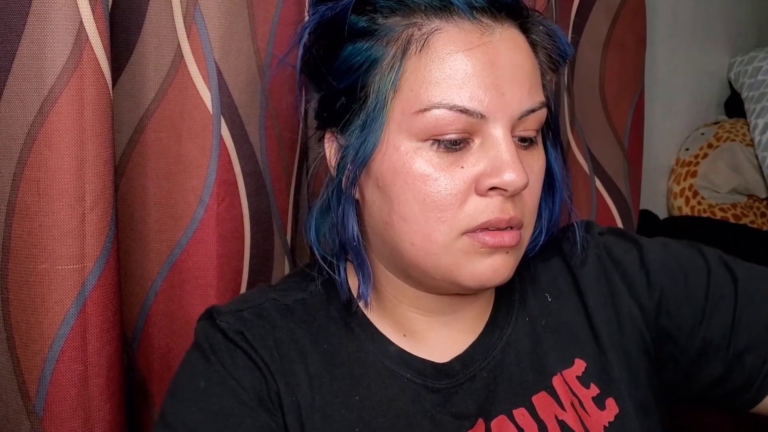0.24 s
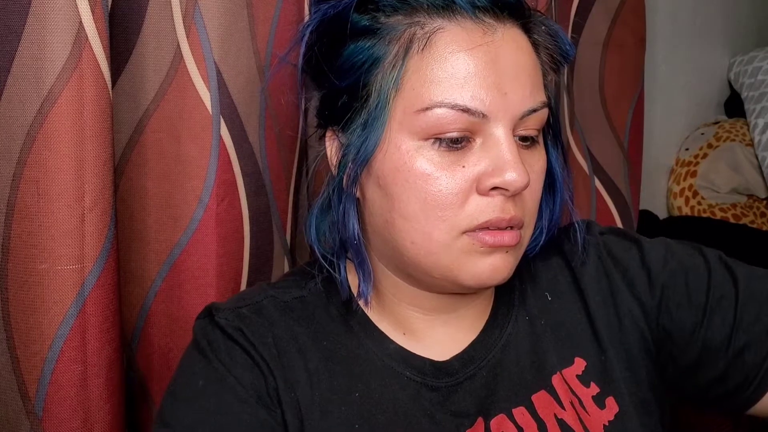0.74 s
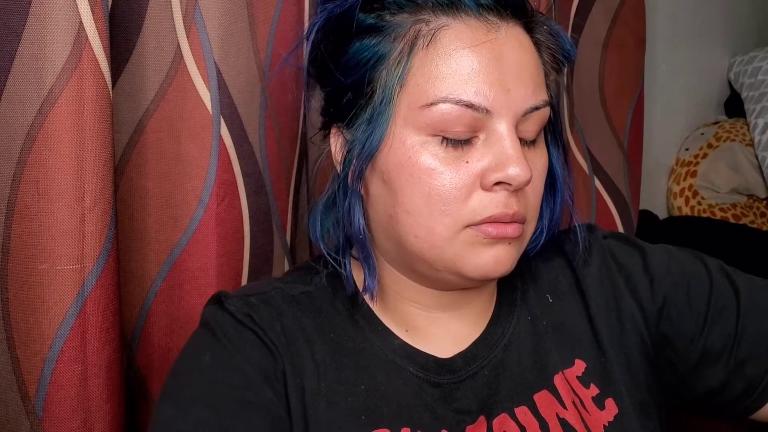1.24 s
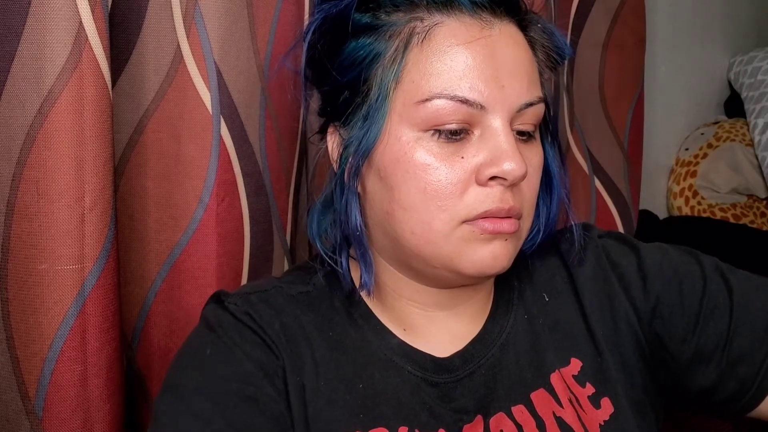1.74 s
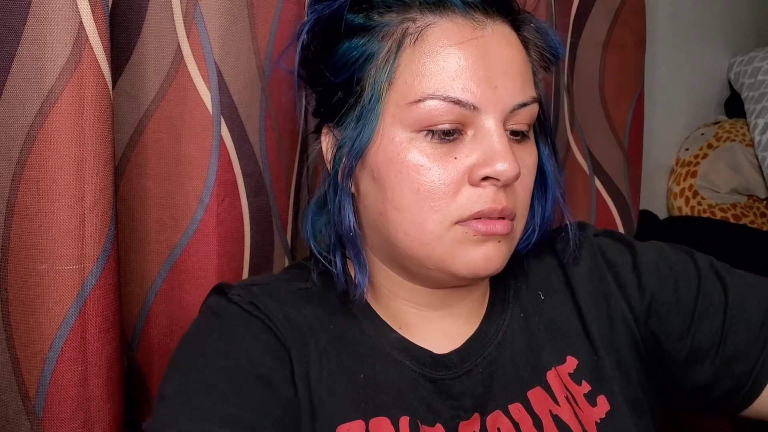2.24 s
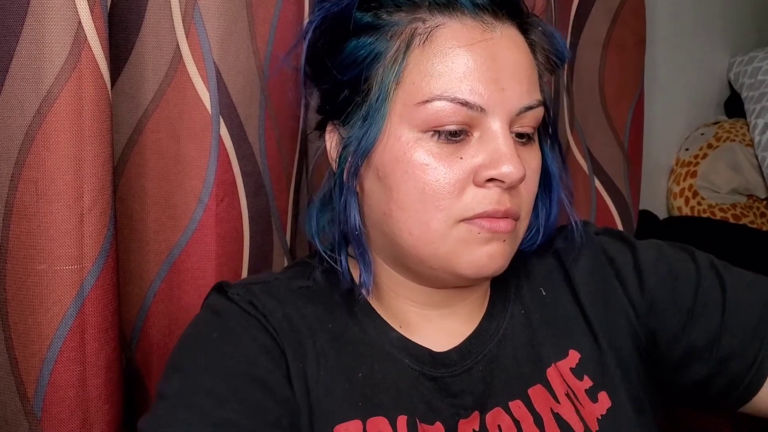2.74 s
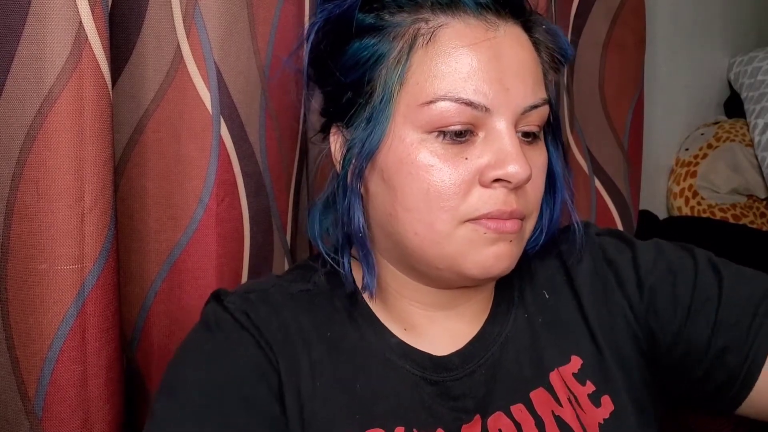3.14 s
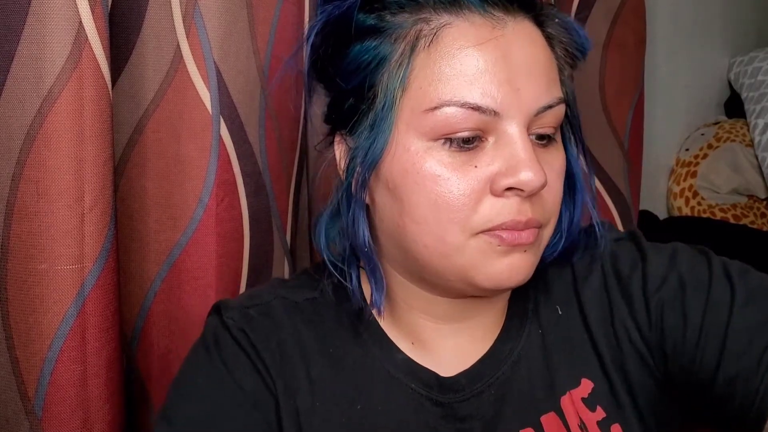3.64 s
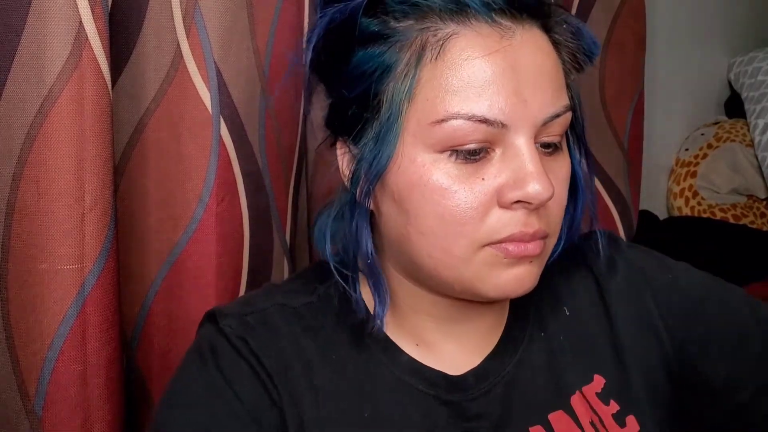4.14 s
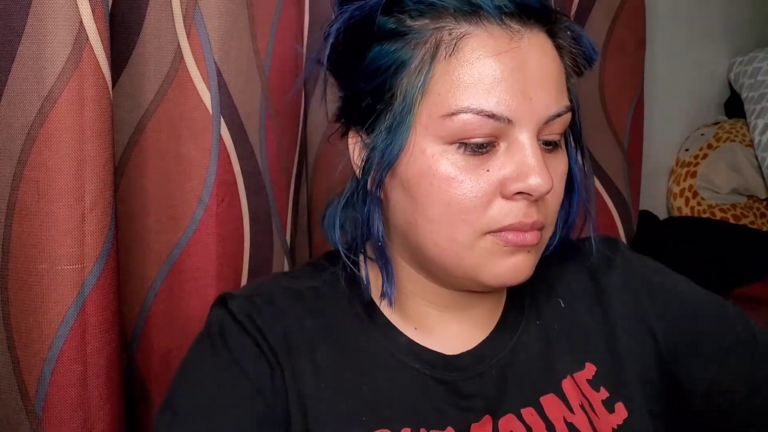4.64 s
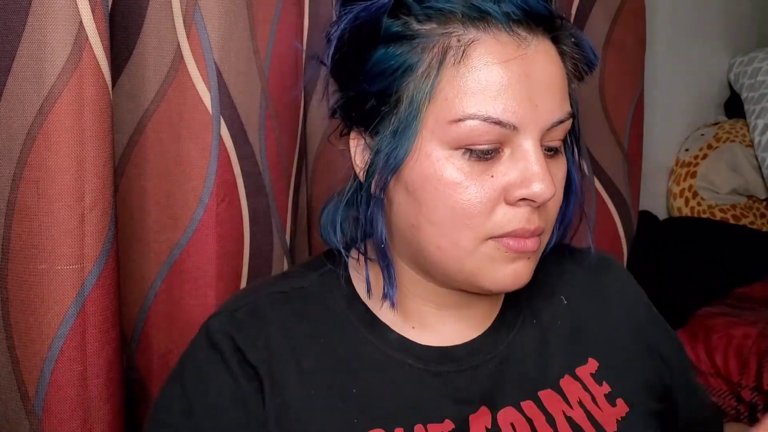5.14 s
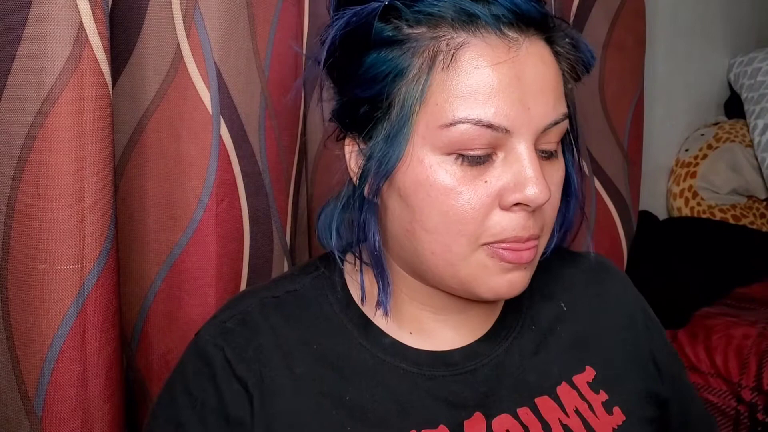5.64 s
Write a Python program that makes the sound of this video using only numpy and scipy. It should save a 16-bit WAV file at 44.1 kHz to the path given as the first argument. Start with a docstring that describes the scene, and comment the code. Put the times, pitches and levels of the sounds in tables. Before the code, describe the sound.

Dry, bright paper crackle opens with a strong tear, drops away, then builds into crinkles and a sharp rip around two and a half seconds. After a quieter patch and a woody knock, dense crumpling resumes, ending with a few table taps. Close stereo pickup to the right, small room, very low background noise.

```python
"""A paper packet is torn and crumpled by hand to the right of a two-port microphone, in a small quiet room.
Showers of tiny noise breaks follow the handling level, with noise-burst creases on top, coloured by the sheet.
Bumps ring decaying table modes; the house is shaped noise with fuzzy low tones and sine thuds.
Paper and table also feed a short noise-tail reverberation."""
import sys
import numpy as np
from scipy import signal
from scipy.fft import rfft, irfft, next_fast_len
from scipy.io import wavfile
from scipy.ndimage import uniform_filter1d, map_coordinates

SR = 44100
rng = np.random.default_rng(int(sys.argv[2]) if len(sys.argv) > 2 else 0)


def materialize(psi):
    """Save the field psi as 16-bit PCM at rate SR to the path in sys.argv[1].

    A 1-D psi becomes a single channel; in a 2-D psi each row is a channel.
    """
    bounded = np.clip(np.atleast_2d(psi).T, -1, 1)
    quanta = np.round(bounded * 32767).astype(np.int16)
    wavfile.write(sys.argv[1], SR, quanta)


N = 259749  # length [samples]

# House noise colour: (frequency [Hz], relative density [dB per Hz])
HOUSE_COLOUR = [(12, -55.5), (20, -32), (40, -10), (70, 2), (107, -12), (198, -11.5), (262, -12.5),
                (367, -13), (399, -15), (527, -17.5), (949, -30.5), (2460, -36.5), (3160, -32), (3440, -30),
                (16000, -61)]
HOUSE_DB = -55.5  # middle of its slow drift
# Fuzzy steady bands: (centre [Hz], width [Hz], rms level [dB])
HUM_BANDS = [(51.6, 56, -64), (122.3, 5.7, -66), (152.7, 6.3, -66.5), (357, 2.9, -72), (3650, 1100, -80)]
# Distant low thuds: (start [s], peak before port gain [dB], frequency [Hz], length [s])
FAR_THUDS = [(0.015, -45, 55.0, 0.17), (0.806, -41, 55.0, 0.13), (1.777, -41, 54.6, 0.085),
             (3.106, -46, 54.6, 0.088), (3.87, -42, 51, 0.16), (4.76, -46, 58.6, 0.12)]
# House noise likeness of left and right: (frequency [Hz], correlation [-1 to 1])
PORT_LIKENESS = [(60, 0.91), (240, 0.95), (950, 0.54), (3770, -0.74), (15000, 0.17)]

# Sudden rips, before the sheet: (start [s], length [s], level at start [dB], level at end [dB])
RIP_EVENTS = [(.141, .2, -23.5, -28.5), (0.887, 0.18, -47, -70), (1.358, .143, -34.5, -41.5),
              (1.724, .095, -37, -32), (1.82, .048, -27, -29), (1.945, .13, -35.5, -39.5),
              (2.557, 0.061, -38.5, -48.5), (2.635, 0.16, -17.5, -43), (4.716, 0.072, -22.5, -32),
              (5.063, .07, -34.5, -54)]
RIP_BITE_S, RIP_STOP_S = .008, .012  # time to rise and to fall 20 dB
# Squeezes, before the sheet: (peak time [s], peak level [dB], 20 dB rise [s], 20 dB fade [s])
SQUEEZE_EVENTS = [(.096, -43, .1, .2), (.36, -43.5, 0.2, .045), (.49, -43.5, .35, .08),
                  (.8, -57, 0.26, 0.28), (1.08, -68, .3, .5), (1.213, -43, .09, .12), (1.3, -51, .3, .05),
                  (1.54, -30, 0.0724, 0.2351), (1.93, -42.5, .05, 0.02), (2.1, -42, .3, .9),
                  (2.339, -27.5, 0.154, 0.1254), (2.475, -40, 0.32, 0.04), (2.826, -36, 0.07, 0.04),
                  (2.893, -34, 0.1, 0.12), (3.1, -47, 0.18, .07), (3.221, -47, 0.16, 0.1),
                  (3.31, -44.5, .08, .07), (3.345, -43, .025, .03), (3.44, -48, .07, .15),
                  (3.575, -47.5, 0.14, 0.02), (4.035, -62, 0.47, 0.13), (4.194, -35.5, 0.13, .2),
                  (4.278, -30, 0.05, 0.07), (4.366, -32, 0.03, .05), (4.526, -32.5, 0.13, 0.11),
                  (4.582, -29.5, .045, 0.13), (4.817, -30.5, 0.1538, .115), (4.921, -39.5, .02, .155),
                  (5.228, -51.5, .09, 0.17), (5.344, -36, 0.08, 0.0745), (5.49, -40, .4, .06),
                  (5.6, -69.5, .1, 3.5)]
REST_DB = -79  # packet merely held

# Clearest creases snapping, before the sheet: (time [s], level [dB], length scale [ms], dullness [-1 to 1])
CREASE_SNAPS = [(.0826, -27.5, 2.6, -.35), (.1103, -21.5, 3.3, -0.55), (.1356, -27, 2.6, .55),
                (.358, -33, 7.8, .9), (.4647, -47, 3.3, -.8), (.707, -47.5, 3.5, .79), (.737, -50, 3, 0),
                (.796, -49, 7.2, .9), (.8928, -32.5, 5.8, -0.22), (1.1789, -40, 3, .05),
                (1.2021, -34.5, 2.1, .9), (1.215, -26.5, 2.5, -0.79), (1.3694, -28.5, 4, .43),
                (1.4361, -21, 6, -.44), (1.468, -35, 5.6, -.34), (1.4772, -31, 3.3, .9),
                (1.5145, -30.5, 4.4, .8), (1.5453, -30.5, 4.1, .6), (1.6088, -32.5, 3.5, 0.59),
                (1.65, -34, 11, -0.35), (1.7009, -32, 2, .02), (1.7224, -32.5, 6.6, -0.56),
                (1.8602, -20, 3.9, -0.69), (1.9494, -19, 1.88, .97), (1.9856, -33, 7.9, .03),
                (2.102, -34, 5.2, .53), (2.1679, -32, 4.8, -.9), (2.1942, -30, 3, -0.22),
                (2.275, -29.5, 6.3, -0.046), (2.3544, -19.5, 3.8, -.9), (2.4582, -33, 3.2, -.57),
                (2.506, -26, 3.1, -0.75), (2.529, -31, 1.9, -.41), (2.564, -27.5, 3.3, 0.27),
                (2.7285, -29, 2.5, -.5), (2.762, -27, 3, -0.9), (2.7805, -30, 6, -.04),
                (2.8264, -31, 5.4, -.35), (2.8455, -29, 5.9, -0.69), (2.9212, -31, 2.3, -.58),
                (3.0459, -37, 1.8, -0.076), (3.1106, -35.5, 8, -0.81), (3.1644, -36.5, 6.2, -0.55),
                (3.442, -37.6, 5.6, -0.53), (3.4595, -37, 2.8, -.68), (3.5492, -32, 1.5, -0.67),
                (3.5617, -34.5, 3.2, -.9), (3.5856, -45, 9, .54), (3.75, -47, 5.9, -.69),
                (4.155, -33, 4.5, -.7), (4.1835, -31, 6.6, -0.24), (4.199, -25, 2.5, -.54),
                (4.2245, -28, 6.9, -0.053), (4.2685, -22, 10, -0.61), (4.291, -23.5, 2.8, -0.37),
                (4.325, -29, 3.4, -.93), (4.365, -23, 10, -0.38), (4.4148, -37.5, 2.8, -.01),
                (4.4652, -32, 2.9, -.06), (4.4786, -28, 2.7, -0.42), (4.521, -25.5, 7.8, -0.64),
                (5.0647, -30.5, 4.1, -0.46), (5.2134, -38.5, 5.7, -0.44), (5.2886, -36, 4, 0.71),
                (5.33, -38.5, 9.2, -0.58), (5.4108, -33.5, 6.1, -.38), (5.7318, -49.5, 5.1, -.54)]
SMALL_SNAPS = 70  # count of lesser creases
SMALL_OVER_DB, SMALL_SPREAD_DB = 6.5, 2.5  # over the crackle around them; plus or minus
SMALL_TOP_DB = -33  # cap before the spread
SMALL_MS, SMALL_DULL = 3.6, -.3  # mean length scale and dullness
SNAP_ABOVE_DB = -60  # gentler handling breaks no lesser crease

# Paper colour: (frequency [Hz], relative density [dB per Hz])
PAPER_COLOUR = [(180, -50.5), (300, -8.5), (398, -11.5), (614, -7.5), (814, -8), (1060, -11.5),
                (1610, -9.5), (1900, -11), (2250, -9), (3400, -4.5), (4370, -7), (9240, -10.5), (11900, -5),
                (15000, -10.5), (16000, -20)]
# Bent sheet: (time [s], gain near 780 Hz [dB], gain near 1.4 kHz [dB], treble gain [dB])
SHEET_BENDS = [(0, -10, 1, -7.5), (.15, -1, 3, -2.5), (.4, 0, 4.5, -5.5), (.6, 2, 1, -5),
               (.85, -8, -1, -6.5), (1.25, -5, -3.5, -5), (1.5, -11.5, 4, -6.5), (1.75, -4.5, 1, 1),
               (2.0, -9, 4, -4), (2.4, 0, 5, -2), (2.7, -5, -1, 1.5), (3.2, 1.5, 5, 1.5),
               (3.55, -2, -1.5, 1), (3.85, 7, 4, -9.5), (4.15, -6, -3, 1.5), (4.35, -10, -4, -1.5),
               (4.5, -7.5, 7, -1.5), (4.75, -4, 5, 0), (4.95, 0, 9, -1), (5.3, 1, 3, -2),
               (5.6, -4, 7.5, -2), (5.89, -5, 2, -10)]
# Packet position: (time [s], left minus right in the treble [dB], left lag [samples])
PACKET_PLACE = [(0, -4.5, 11.9), (.75, -9.5, 10.3), (1.3, -7.5, 9.8), (1.8, -9, 14.1), (2.8, -9.5, 12.8),
                (3.4, -13, 17.8), (3.8, -10.5, 17.6), (4.3, -7, 13.05), (4.8, -6.5, 6.1), (5.3, -2, 10.5),
                (5.89, -9, 8.8)]

# Bumps on the table: (time [s], nominal level [dB], t60 stretch [factor], favoured pitch [Hz])
TABLE_BUMPS = [(.158, -26.5, 0.62, 700), (0.213, -50, 1.3, 880), (0.656, -53, 1.2, 201),
               (1.72, -48.5, 3.5, 265), (2.32, -42, 1.02, 690), (2.635, -34.5, 1.56, 396),
               (3.5807, -25.5, 1, 560), (3.585, -38, 1.6, 118), (3.5995, -39.5, 1.6, 320),
               (4.149, -42, 1.1, 178), (4.713, -44, 1.1, 316), (5.329, -34.5, 1.12, 420),
               (5.359, -33.5, 1, 330), (5.368, -40, 0.74, 110), (5.396, -40, 1.3, 443),
               (5.419, -37, 1.08, 446), (5.447, -49.5, 1.3, 380), (5.674, -38.5, 0.93, 1800),
               (5.684, -41.5, .9, 900)]
# Table modes: (frequency [Hz], relative level [dB], unstretched t60 [s])
TABLE_MODES = [(116, 9.5, 0.031), (230, -3, .06), (347.3, -8.5, 0.12), (424, -2.5, 0.053),
               (557, -0.5, 0.036), (652, -1.5, 0.032), (850, -16, 0.032), (990, -16.5, .04),
               (1260, -17, 0.018), (1443, -12, 0.038), (1820, -12.5, 0.018), (2200, -19.5, .03)]

# Room decay: (frequency [Hz], t60 [s])
ROOM_T60 = [(300, 0.16), (2000, 0.26), (12000, 0.047)]
TOP_HZ = 15800  # middle of the final treble fade


def amp(db):
    """Decibels to amplitude."""
    return 10 ** (np.asarray(db) / 20)


def unit(x):
    """Scale to an rms of one."""
    return x / np.sqrt(np.mean(x ** 2) + 1e-20)


def along(points, hz):
    """Read (frequency [Hz], value) points on a log axis."""
    f, v = np.transpose(points)
    return np.interp(np.log(hz + 1), np.log(f + 1), v)


def curves(rows, t):
    """Each column after the time, read at times t."""
    s, *cols = np.transpose(rows)
    return [np.interp(t, s, c) for c in cols]


def wobble(knots_per_s):
    """A smooth random curve through normal knots."""
    knots = rng.standard_normal(int(N * knots_per_s / SR) + 4)
    return map_coordinates(knots, [np.arange(N) * knots_per_s / SR])


def filtered(x, response):
    """x times a response of frequency."""
    m = next_fast_len(N + SR // 2)
    return irfft(rfft(x, m) * response(np.fft.rfftfreq(m, 1 / SR)), m)[..., :N]


def add(track, s, sound):
    """Mix a sound in at s seconds."""
    k = max(round(s * SR), 0)
    track[k:k + len(sound)] += sound[:len(track) - k]


def port_noise(gain):
    """Unit noise at two ports; the mid/side balance sets their correlation at each frequency."""
    def mid_side(hz):
        angle = np.arccos(np.clip(along(PORT_LIKENESS, hz), -1, 1)) / 2
        return gain(hz) * np.array([np.cos(angle), np.sin(angle)])

    mid, side = filtered(rng.standard_normal((2, N)), mid_side)
    return unit(np.array([mid + side, mid - side]))


def thuds():
    """Distant low sines under a quick swell and exponential fade."""
    out = np.zeros(N)
    for s, db, hz, length_s in FAR_THUDS:
        t = np.arange(round(length_s * SR)) / SR
        v = 12 * t / length_s
        envelope = v * np.exp(1 - v / 2) / 2  # peaks at 1
        add(out, s, amp(db) * np.sin(2 * np.pi * hz * t) * envelope)
    return out


def house():
    """Drifting air and appliance noise, fuzzy tones, and thuds a little louder at the left port than the right."""
    drift_db = HOUSE_DB + 1.36 * wobble(1.4)
    air = amp(drift_db) * port_noise(lambda hz: amp(along(HOUSE_COLOUR, hz)))
    for centre, width, db in HUM_BANDS:
        air += amp(db) * port_noise(lambda hz: 1 / (1 + (2 * (hz - centre) / width) ** 2))
    return air + thuds() * amp([[.7], [-.7]])


def handling():
    """Crackle level in dB: rips bite and stop, squeezes swell and fade, and their powers add."""
    t, power = np.arange(N) / SR, amp(REST_DB) ** 2
    for s, length_s, start_db, end_db in RIP_EVENTS:
        body_db = np.interp(t, [s, s + length_s], [start_db, end_db])
        edges = np.maximum(s - t, 0) / RIP_BITE_S + np.maximum(t - s - length_s, 0) / RIP_STOP_S
        power = power + amp(body_db - 20 * edges) ** 2
    for s, db, rise_s, fade_s in SQUEEZE_EVENTS:
        power = power + amp(db - 20 * np.maximum((s - t) / rise_s, (t - s) / fade_s)) ** 2
    return 10 * np.log10(power)


def small_snaps(crackle_db):
    """Lesser creases give way at random while the packet is worked, as hard as the handling then, to a cap."""
    when, size, life, tone = rng.random((SMALL_SNAPS, 4)).T
    busy = np.flatnonzero(crackle_db > SNAP_ABOVE_DB)
    at = busy[(when * len(busy)).astype(int)]
    db = np.minimum(crackle_db[at] + SMALL_OVER_DB, SMALL_TOP_DB)
    db = db + SMALL_SPREAD_DB * (2 * size - 1)
    return list(zip(at / SR, db, SMALL_MS * (.5 + life), SMALL_DULL + tone - .5))


def shower(crackle_db):
    """Clumped tiny breaks of unequal size; the wide sheet gives each port partly its own."""
    sparse = np.clip(-(crackle_db + 19.0) / 30, .55, 1.3)  # a gentle crumple is lumpier than a full rip
    clumps_db = .4 * wobble(40) + 2.3 * wobble(180) + 2.2 * wobble(700)
    sizes_db = np.minimum(2.6 * rng.exponential(size=N), 9) + sparse * clumps_db
    strength = amp(crackle_db) * unit(amp(sizes_db))
    both, own = rng.standard_normal(N), rng.standard_normal((2, N))
    own = filtered(strength * own, lambda hz: np.clip(hz / 1300, 0, 1))  # less of it in long waves
    return np.cos(.85) * strength * both + np.sin(.85) * own


def fibres():
    """Breaking fibres, with creases snapping on top as short bursts of partly shared noise."""
    crackle_db = handling()
    out = shower(crackle_db)
    t = np.arange(SR // 20) / SR
    for s, db, ms, dull in [*CREASE_SNAPS, *small_snaps(crackle_db)]:
        grit = rng.standard_normal((3, len(t)))
        u = t * 1000 / max(ms, 1)
        envelope = np.exp(-((u - .45) / 0.33) ** 2) + 0.058 * np.exp(-u)
        for port in (0, 1):
            heard = np.cos(.7) * grit[2] + np.sin(.7) * grit[port]
            # a dull crease loses its treble
            burst = unit(np.convolve(heard, [1, np.clip(dull, -1, 1)], "same"))
            add(out[port], s, amp(db) * burst * envelope)
    return out


def sheet(breaks):
    """The sheet colours the breaks as it is bent; the far port hears it weaker and later."""
    hz, t, z = signal.stft(breaks, SR, nperseg=256)
    hz = hz[:, None]
    body_db, ring_db, fine_db = curves(SHEET_BENDS, t)
    pan_db, lag = curves(PACKET_PLACE, t)
    body = 1 / (1 + ((hz - 780) / 330) ** 2)
    ring = 1 / (1 + ((hz - 1400) / 260) ** 2)
    treble = np.clip(np.log2((hz + 1) / 5000), 0, 1)
    bend_db = body * body_db + ring * ring_db + treble * fine_db
    # random flicker, smoothed over frequency and time
    field = uniform_filter1d(uniform_filter1d(rng.standard_normal(z.shape[1:]), 5, 0), 8, 1)
    z = z * amp(along(PAPER_COLOUR, hz) + bend_db + 2.0 * unit(field) + 5.5)
    shadow = np.clip(np.log2(hz + 1) / 4.16 - 1.9, 0, 1)  # long waves bend round to both ports
    half = amp(shadow * pan_db / 2) * np.exp(-1j * np.pi * hz * lag / SR)
    return signal.istft(z * np.array([half, 1 / half]), SR, nperseg=256)[1][:, :N]


def bumps():
    """Soft blows ring the table top; the spot that is hit favours the modes near one pitch."""
    out, t = np.zeros(N), np.arange(SR // 3) / SR
    hz, mode_db, t60_s = np.transpose(TABLE_MODES)[:, :, None]
    onset = 1 - np.exp(-t / 0.0027)
    for s, db, stretch, spot_hz in TABLE_BUMPS:
        luck_db = rng.normal(0, 1.5, (len(TABLE_MODES), 1))
        strength_db = mode_db + luck_db - 7 * np.abs(np.log2(hz / spot_hz))
        ring = amp(strength_db - 60 * t / (t60_s * stretch)) * np.sin(2 * np.pi * hz * t)
        add(out, s, -amp(db + 4.5) * ring.sum(0) * onset)
    return out


def room(x):
    """Noise tails, each frequency dying at its own speed; every block of sound draws a new tail."""
    block, delay = 2048, 90  # samples
    out = np.zeros((2, N + SR))
    for k in range(0, N, block):
        hz, t, z = signal.stft(rng.standard_normal((2, SR // 4)), SR, nperseg=256)
        decay = amp(-60 * t / along(ROOM_T60, hz)[:, None])
        tail = signal.istft(z * decay, SR, nperseg=256)[1]
        wet = signal.fftconvolve(x[None, k:k + block], tail / np.linalg.norm(tail[0]), axes=1)
        out[:, k + delay:k + delay + wet.shape[1]] += wet
    return out[:, :N]


def scene():
    """Sum of the house, the paper and table, and the room's answer to both."""
    paper, table = sheet(fibres()), bumps()
    paper_wet = amp(-13) * room(paper[1]) * amp([[-.5], [.5]])  # fed from the near port
    table_dry = table * amp([[-1.4], [1.4]])  # port gains in dB
    table_wet = amp(-16) * room(table)
    return paper + table_dry + table_wet + paper_wet + house()


def record(dry):
    """Fade the treble to nothing over 700 Hz around TOP_HZ."""
    return filtered(dry, lambda hz: np.clip((TOP_HZ + 350 - hz) / 700, 0, 1) ** 2)


dry = scene()
out = record(dry)
materialize(out)
```